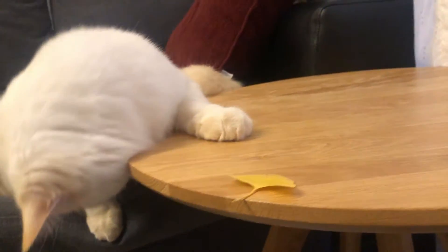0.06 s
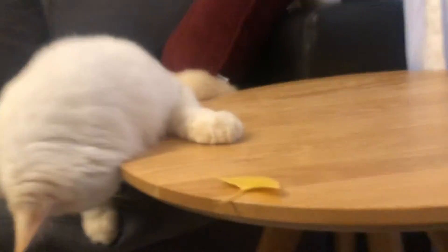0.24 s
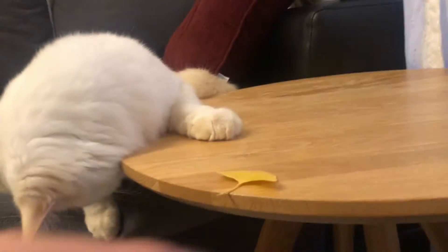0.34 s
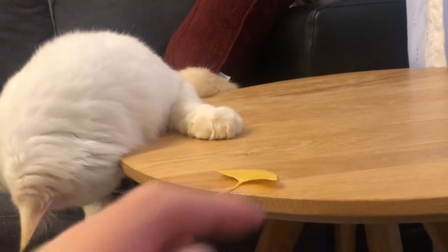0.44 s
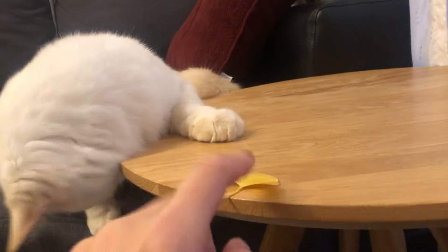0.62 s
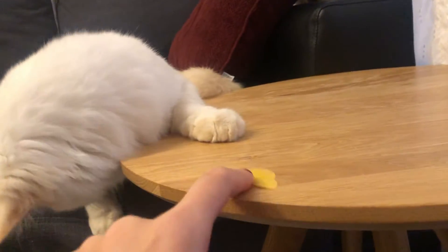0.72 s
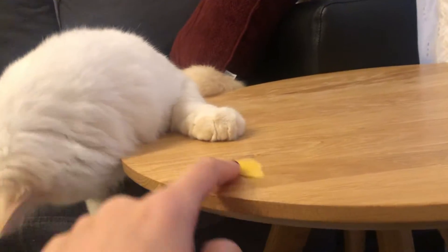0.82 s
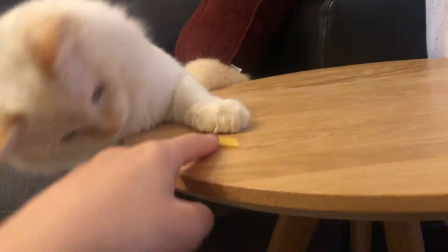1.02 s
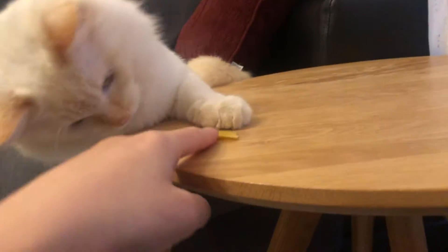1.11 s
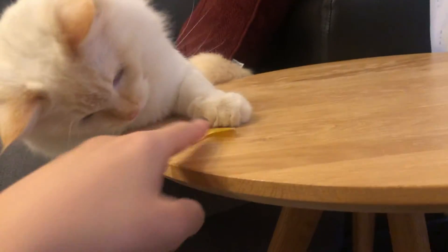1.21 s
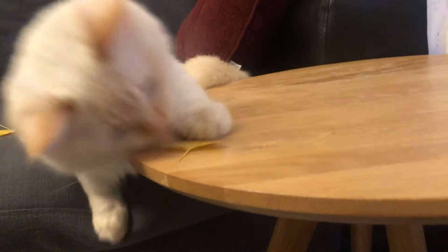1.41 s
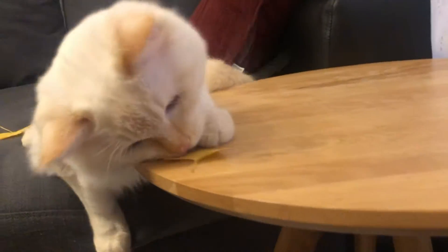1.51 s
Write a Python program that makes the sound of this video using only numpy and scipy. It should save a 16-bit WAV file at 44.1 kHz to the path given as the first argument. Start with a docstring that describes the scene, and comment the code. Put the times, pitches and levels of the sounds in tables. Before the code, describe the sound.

A sharp tap on a wooden table comes at about 0.25 seconds, close by, with a faint, thin ring. From 0.7 to 1.2 seconds a fingertip slides a leaf across the wood, making a soft, high hiss. Around 1.4 seconds a cat's fur brushes the table edge, and the cat lands on a sofa with a soft, dull thump near 1.5 seconds. A faint, low room rumble lies underneath.

```python
"""A quiet room, close to a wooden table. A sharp tap shakes the top; something hard rings faintly with it.
A fingertip lands on a leaf and slides it across the wood, and the rubbing makes a soft, high hiss.
Then a cat lunges for the leaf: its fur brushes the table edge and it lands with a dull thump on the sofa.
A low rumble and a faint drone lie under it all."""
import sys
import numpy as np
from scipy import signal
from scipy.fft import rfft, irfft, next_fast_len
from scipy.io import wavfile
from scipy.ndimage import map_coordinates

SR = 44100
rng = np.random.default_rng(int(sys.argv[2]) if len(sys.argv) > 2 else 0)


def int16_out(signal):
    """Quantize to a 16-bit WAV file."""
    q = np.round(np.clip(np.atleast_2d(signal).T, -1, 1) * 32767)
    wavfile.write(sys.argv[1], SR, q.astype(np.int16))


N = 68355

# A "colour" says how strong each pitch is compared with the others. fade_s is the time to drop by 60 dB.
# The broad pitch ranges in which the table top shakes most easily: pitch_hz, width_hz, gain_db
WOOD_RESONANCES = [(163, 40, 7), (322.5, 79.4, 23.5), (806, 85, 19.5), (1084, 82.5, 19), (1414, 82, 12),
                   (1764, 57, 9.5), (1960, 100, 10), (2550, 196, 8), (3045, 170, 11.5)]
# Colour of the tap's sharp crack: pitch_hz, gain_db
CRACK_COLOUR = [(300, -50), (2900, -34), (3600, -2.5), (4500, 4), (4800, -1.5), (5250, 7), (7200, 2.5),
                (8600, 3.5), (10000, -8), (11700, -2), (13000, -19), (14800, -12), (15800, -35)]
# Colour of the faint swell of noise just before the tap: pitch_hz, gain_db
SWELL_COLOUR = [(80, -35), (200, -1.5), (400, -1), (560, -5), (750, -2.5), (1200, -1), (2000, -7),
                (3100, -37), (4200, -28.5)]
# The tones of a small hard object: pitch_hz, gain_db, fade_s
RING_TONES = [(1787, 0, .165), (2869, -19, .14), (3200, -25, .09), (3871, -25, .11)]
# The knocks that set it ringing: start_s, level_db, quiet_below_hz
RING_KNOCKS = [(0.2472, -42.5, 500), (1.359, -42, 2600)]

# How loud the sliding leaf is: time_s, level_db
SLIDE_LEVEL = [(0.7, -79), (0.716, -89), (0.722, -70.5), (0.73, -54), (0.744, -66), (0.862, -65.5),
               (0.954, -62.5), (1.058, -62), (1.122, -67), (1.186, -84), (1.2, -79.5)]
# Colour of the leaf's hiss: pitch_hz, gain_db
HISS_COLOUR = [(590, -41), (1000, -5), (1120, -14), (1730, -6.5), (1940, -13), (2620, -8), (5970, -10.5),
               (11700, -3), (16000, -8.5)]
# How the sheen, a bright band in that hiss, swells and fades: time_s, gain_db
SHEEN_SWELL = [(.73, -17.5), (.8, -3), (.93, 4), (1.04, 0.5), (1.12, -15.5)]
# Where the middle of that band lies: time_s, pitch_hz
SHEEN_PITCH = [(.75, 12300), (.9, 11400), (.96, 12100), (1.04, 14200), (1.11, 9900)]

# How loud the cat's brushing fur is: time_s, level_db
FUR_LEVEL = [(1.33, -100.5), (1.37, -77), (1.41, -66.5), (1.455, -62), (1.485, -62.5), (1.52, -68.5),
             (1.55, -75)]
# Colour of fur on wood: pitch_hz, gain_db
FUR_BRUSH_COLOUR = [(470, -43.5), (800, -6.5), (1190, -19), (1290, -10), (1830, -10.5), (2840, -9.5),
                    (12300, -14), (16000, -15)]
# The cat's weight coming down: peak_s, level_db, rise_s, fade_s, pitch_hz, width_octaves
LANDING_THUMPS = [(1.46, -58.5, 0.043, 0.31, 585, 0.63), (1.462, -51.5, 0.015, 0.23, 216, 0.21),
                  (1.469, -61.5, 0.096, 0.61, 305, 0.26), (1.483, -44.5, 0.018, 0.073, 84, 0.16)]

# Small dry touches on the wood: peak_s, level_db, fade_s
WOOD_TICKS = [(.2497, -34.5, 0.0099), (.2612, -56, 0.008), (.725, -52, 0.004), (0.732, -62, 0.0014)]
# Colour of those ticks: pitch_hz, gain_db
TICK_COLOUR = [(500, -21), (2000, -11.5), (6000, -3.5), (11000, -6), (16000, -19)]
# Soft rubs of hand, leaf and paw: peak_s, level_db, pitch_hz, width_octaves, rise_s, fade_s
SOFT_RUBS = [(0.054, -68, 1140, 0.44, 0.0054, 0.27), (0.354, -63, 1500, 0.2, 0.0053, 0.32),
             (0.73, -60, 13270, 0.27, 0.0027, 0.18), (0.741, -69, 2320, 0.2, 0.0058, 0.21),
             (0.776, -59, 2130, 0.48, 0.0034, .13), (0.961, -65.5, 2800, 0.19, 0.0024, 0.17),
             (1.245, -76, 8750, .12, 0.018, .12), (1.36, -59.5, 3400, 0.41, .002, 0.044),
             (1.42, -65, 3700, 0.5, 0.033, 0.29)]

# How long the room's echo lasts: pitch_hz, fade_s
ECHO_FADE = [(150, .16), (1000, .14), (3000, 0.11), (12000, 0.19)]
# The echo's strength against the direct sound: pitch_hz, gain_db
ECHO_COLOUR = [(80, -43), (300, -37.5), (700, -20.5), (1200, -33.5), (3000, -21.5), (8000, -35),
               (15000, -36.5)]
# Colour of the room's background noise: pitch_hz, gain_db
BACKGROUND_COLOUR = [(12, -52), (20, -5), (38, 1), (120, -9.5), (146, -3.5), (187, -16.5), (210, -10),
                     (285, -10), (328, -11.5), (590, -16.5), (780, -19.5), (1190, -22.5), (2320, -26.5),
                     (8890, -32), (16000, -41.5)]
# The rumble's strength, with a brief dip after the tap: time_s, gain_db
RUMBLE_GAIN = [(.27, 6), (.31, -6), (.38, -2), (.5, 2), (1.55, 2.5)]
# How loud the low drone is: time_s, level_db
DRONE_LEVEL = [(0, -71.5), (.85, -76), (1.1, -64), (1.3, -68.5), (1.55, -68.5)]

TAP_S = .24845


def tap():
    """A sharp crack, then waves that bend the table top, treble first and bass last, then a shudder."""
    def crack_and_bend(hz):
        khz = np.maximum(hz, 280) / 1000
        delay_s = .0018 * khz ** -.96  # low bending waves travel more slowly
        phase = -2 * np.pi * np.cumsum(delay_s) * hz[1]  # hz[1] is the step between pitches
        return wood_gain(hz) * np.exp(1j * phase) + amp(at_pitch(CRACK_COLOUR, hz) - 1)
    blow = np.zeros(N)
    blow[round(TAP_S * SR)] = 1
    wood_noise = unit(filtered(rng.standard_normal(N), wood_gain))
    shudder = amp(-39.5) * burst(TAP_S + .0089, rise_s=.00222, fade_s=.039) * wood_noise
    return filtered(blow, crack_and_bend) + shudder


def wood_gain(hz):
    """How strongly the table top answers at each pitch: one smooth hill for each resonance."""
    return sum(amp(db) * np.exp(-.5 * ((hz - pitch) / width) ** 2) for pitch, width, db in WOOD_RESONANCES)


def swell_before_tap():
    """A faint, dull swell of noise leads into the tap and stops there."""
    length_s, end_db, swell_db, top_hz = .021, -34.5, 24.5, 4000
    progress = (clock() - TAP_S) / length_s  # -1 at the start, 0 at the tap
    gate = np.clip((progress + 1) * 10, 0, 1) * (progress < 0)
    level = gate * amp(end_db + swell_db * np.minimum(progress, 0))
    return filtered(level * noise(SWELL_COLOUR), lambda hz: 1 / (1 + (hz / top_hz) ** 20))


def object_ring():
    """A hard object rings thinly with the tap, and again, higher and fainter, when the cat moves."""
    sound = np.zeros(N)
    for hz, gain_db, fade_s in RING_TONES:
        for start_s, level_db, quiet_below_hz in RING_KNOCKS:
            level = amp(level_db + gain_db) / (1 + (quiet_below_hz / hz) ** 20)
            tone = np.sin(2 * np.pi * hz * (clock() - start_s))
            sound += level * burst(start_s, .00055, fade_s) * tone
    return sound


def leaf_slide():
    """The leaf rubs over the grain: a fine hiss with a bright band that wanders with the stroke."""
    level = amp(curve(SLIDE_LEVEL) + wobble(400))
    middle_hz, width_octaves = curve(SHEEN_PITCH), .16
    # Narrow bands of noise each grow louder as the middle pitch passes them.
    sheen = sum(band(hz, .05) * np.exp(-.5 * (np.log2(hz / middle_hz) / width_octaves) ** 2)
                for hz in np.geomspace(9000, 16000, 9))
    hiss = amp(-.5) * noise(HISS_COLOUR)
    return level * (hiss + amp(curve(SHEEN_SWELL) - 3) * unit(sheen))


def cat_lunge():
    """Fur brushes the table edge, then the body lands softly on the sofa."""
    fur = amp(curve(FUR_LEVEL) + 1.6 * wobble(150)) * noise(FUR_BRUSH_COLOUR)
    thumps = sum(amp(db) * burst(peak_s, rise_s, fade_s) * band(hz, octaves)
                 for peak_s, db, rise_s, fade_s, hz, octaves in LANDING_THUMPS)
    return fur + thumps


def light_touches():
    """Hand, leaf and paw make tiny dry ticks and soft rubs, each a burst of noise."""
    tick_level = sum(amp(db) * burst(peak_s, .000089, fade_s) for peak_s, db, fade_s in WOOD_TICKS)
    ticks = tick_level * noise(TICK_COLOUR)
    rubs = sum(amp(db) * burst(peak_s, rise_s, fade_s) * band(hz, octaves)
               for peak_s, db, hz, octaves, rise_s, fade_s in SOFT_RUBS)
    return ticks + rubs


def room_echo(sound):
    """The furnished room gives every sound a short, weak tail."""
    pitches, times, spectrum = signal.stft(rng.standard_normal(SR // 2), SR, nperseg=256)
    fade = np.exp(-np.log(1000) * times / at_pitch(ECHO_FADE, pitches)[:, None])
    tail = signal.istft(spectrum * fade, SR, nperseg=256)[1]
    echo = signal.fftconvolve(sound, tail / np.linalg.norm(tail))[:N]
    return filtered(echo, lambda hz: amp(at_pitch(ECHO_COLOUR, hz)))


def background():
    """The room's steady hiss, a low rumble that dips briefly, and a faint drone."""
    room_noise = amp(-65) * noise(BACKGROUND_COLOUR)
    rumble = filtered(room_noise, lambda hz: 1 / (1 + (hz / 550) ** 2) ** 2)  # the part below about 550 Hz
    hiss = room_noise - rumble
    drone = amp(curve(DRONE_LEVEL)) * band(hz=112.4, octaves=.1266)
    return hiss + amp(curve(RUMBLE_GAIN)) * rumble + drone


def amp(db):
    """Turn decibels into a number to multiply by."""
    return 10 ** (np.asarray(db) / 20)


def unit(sound):
    """Scale a sound to an average strength (rms) of 1."""
    return sound / np.sqrt(np.mean(sound ** 2) + 1e-20)


def at_pitch(points, hz):
    """Read between (pitch_hz, value) points, with octaves evenly spaced."""
    pitches, values = np.transpose(points)
    return np.interp(np.log(hz + 1), np.log(pitches + 1), values)


def clock():
    """The time of every sample, in seconds."""
    return np.arange(N) / SR


def curve(points):
    """Join (time_s, value) points with straight lines."""
    return np.interp(clock(), *np.transpose(points))


def wobble(per_second):
    """A smooth curve through this many random values a second."""
    return map_coordinates(rng.standard_normal(int(N * per_second / SR) + 4), [clock() * per_second])


def filtered(sound, response):
    """Change the strength and timing of each pitch as response(hz) says."""
    size = next_fast_len(N + SR // 2)
    return irfft(rfft(sound, size) * response(np.fft.rfftfreq(size, 1 / SR)), size)[:N]


def noise(colour):
    """Noise of strength 1 with the given colour."""
    return unit(filtered(rng.standard_normal(N), lambda hz: amp(at_pitch(colour, hz))))


def band(hz, octaves):
    """Noise of strength 1 gathered around one pitch."""
    return unit(filtered(rng.standard_normal(N), lambda f: 1 / (1 + (np.log2((f + 1) / hz) / octaves) ** 2)))


def burst(peak_s, rise_s, fade_s):
    """A loudness shape that swells to 1 at peak_s and dies away."""
    age_s = clock() - peak_s
    return np.exp(np.where(age_s < 0, age_s / rise_s, -np.log(1000) * age_s / fade_s))


def scene():
    """All the sounds together in the quiet room, in one channel."""
    direct = tap() + object_ring() + swell_before_tap() + light_touches() + leaf_slide() + cat_lunge()
    return (direct + room_echo(direct) + background())[None]


def record(dry):
    """Take away the deepest bass and the very highest treble."""
    low_hz, top_hz = 44, 15900
    return np.array([filtered(channel, lambda hz: (hz < top_hz) / np.sqrt(1 + (low_hz / (hz + 1)) ** 12))
                     for channel in dry])


dry = scene()
out = record(dry)
int16_out(out)
```